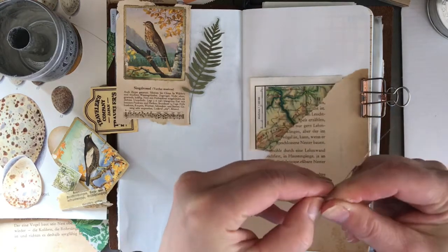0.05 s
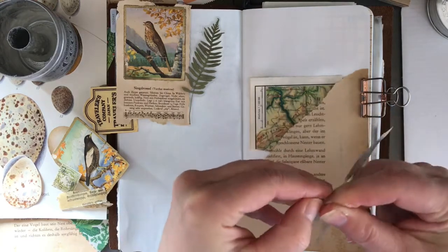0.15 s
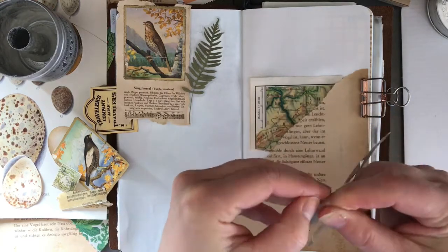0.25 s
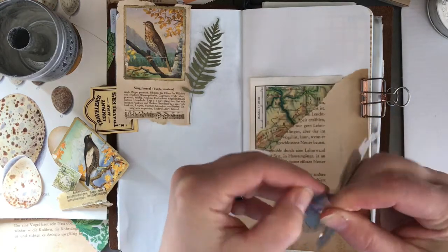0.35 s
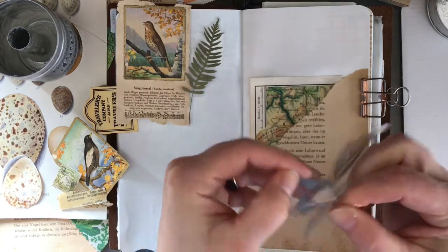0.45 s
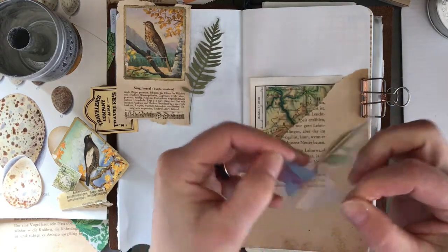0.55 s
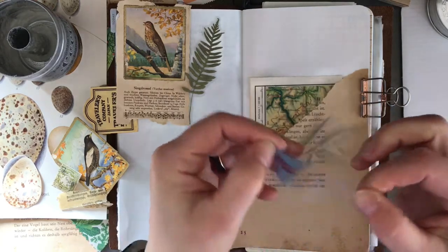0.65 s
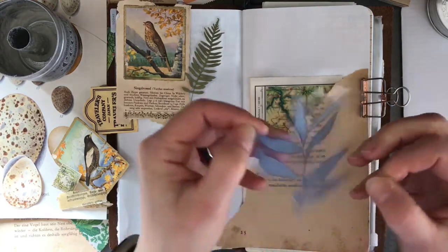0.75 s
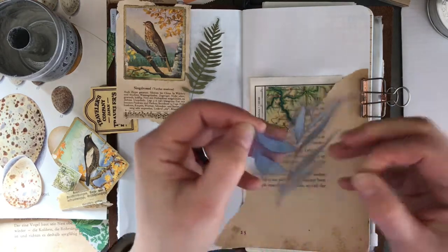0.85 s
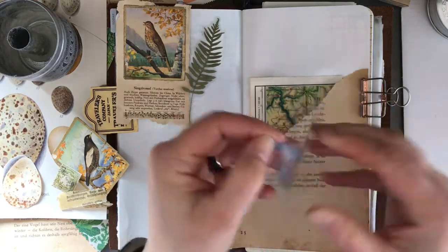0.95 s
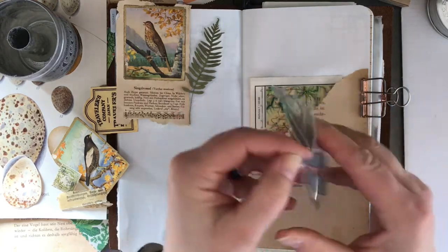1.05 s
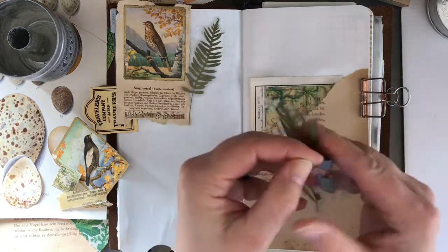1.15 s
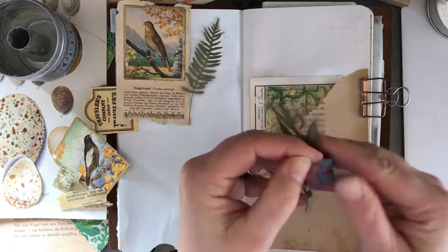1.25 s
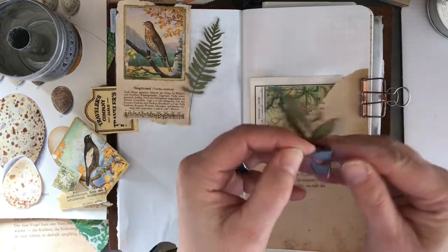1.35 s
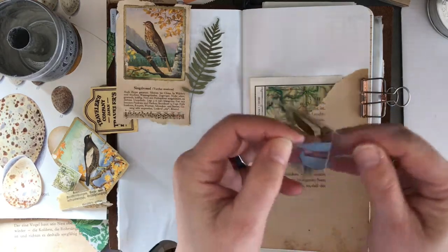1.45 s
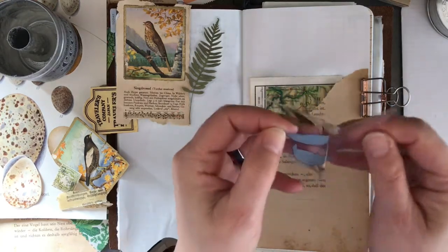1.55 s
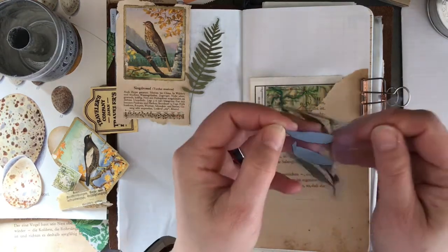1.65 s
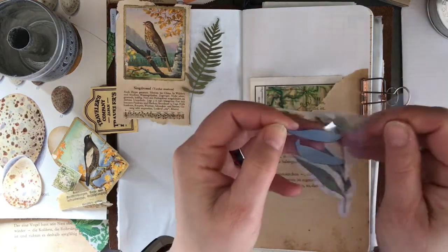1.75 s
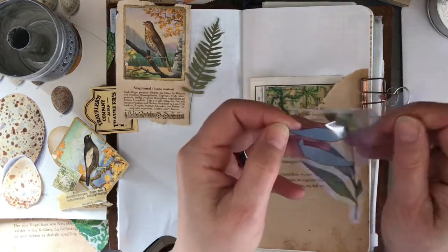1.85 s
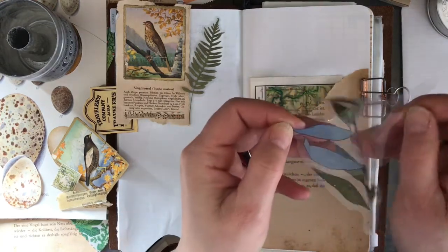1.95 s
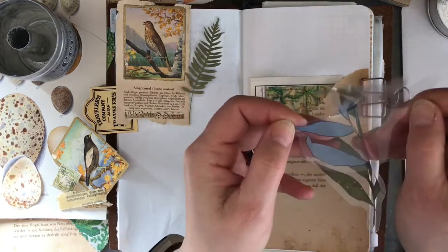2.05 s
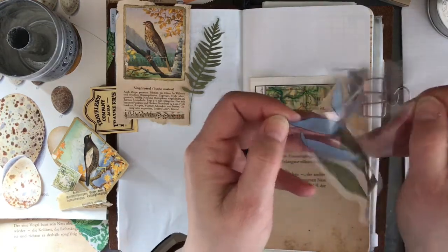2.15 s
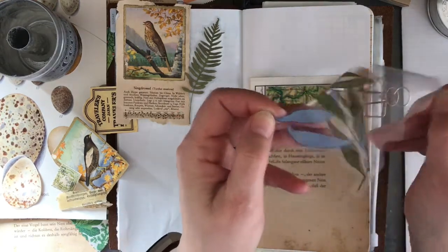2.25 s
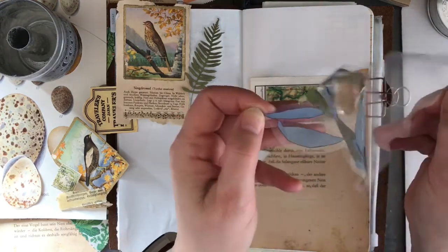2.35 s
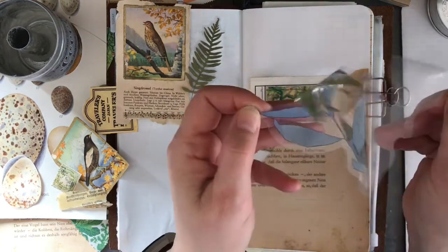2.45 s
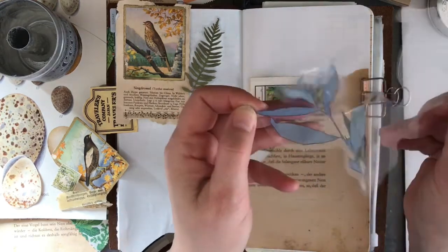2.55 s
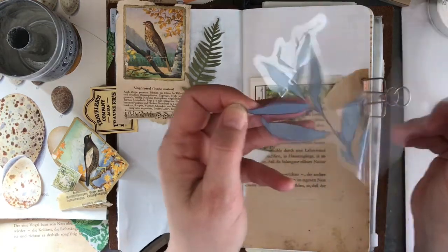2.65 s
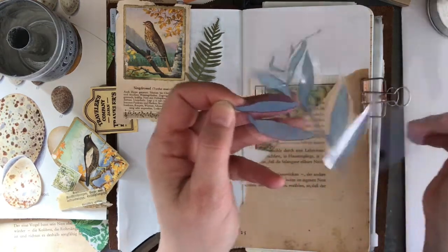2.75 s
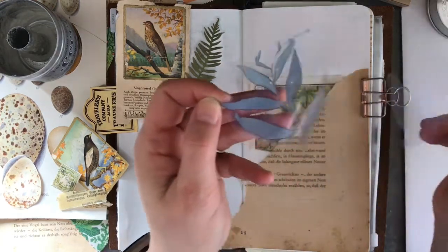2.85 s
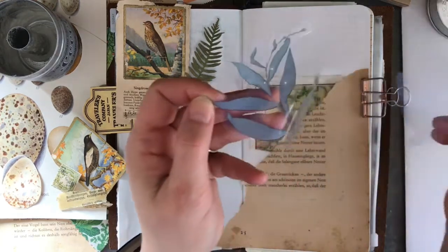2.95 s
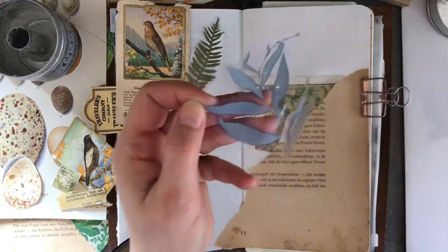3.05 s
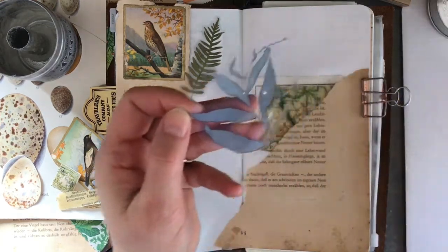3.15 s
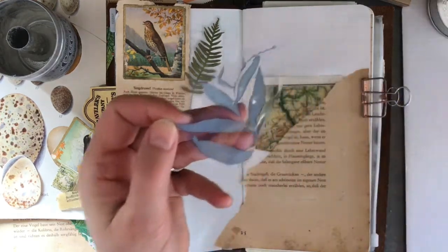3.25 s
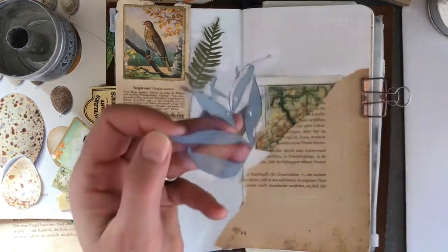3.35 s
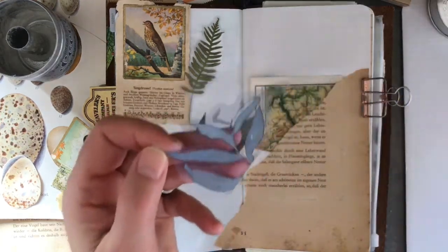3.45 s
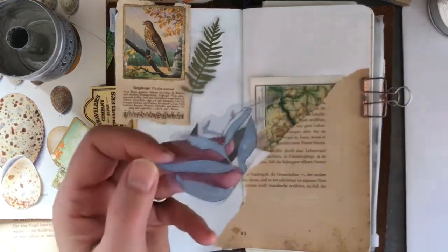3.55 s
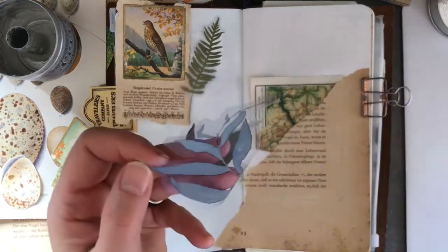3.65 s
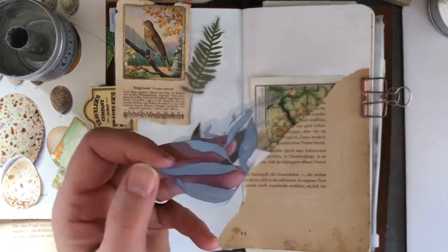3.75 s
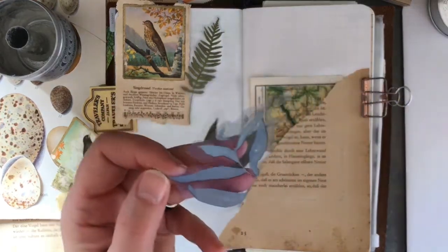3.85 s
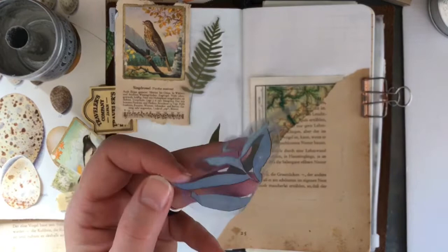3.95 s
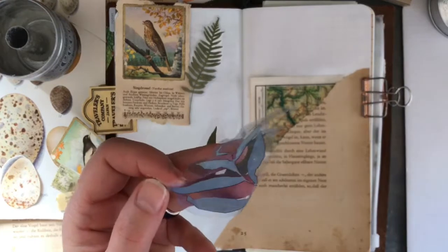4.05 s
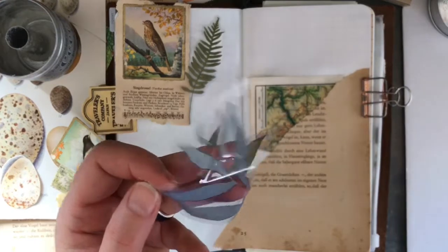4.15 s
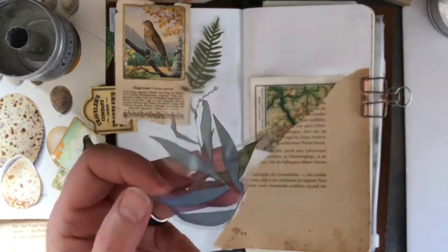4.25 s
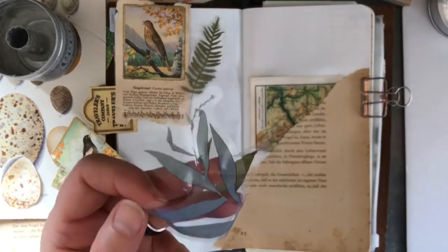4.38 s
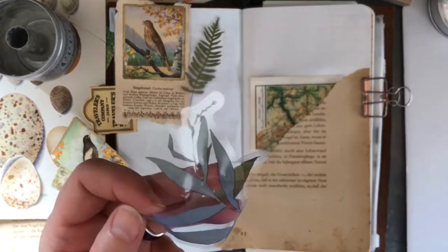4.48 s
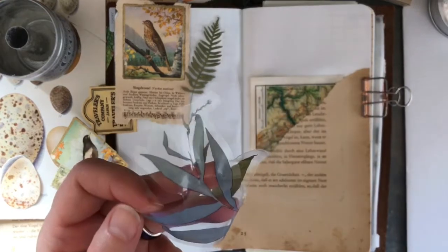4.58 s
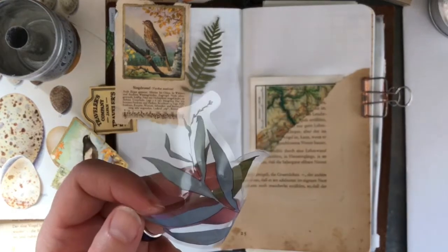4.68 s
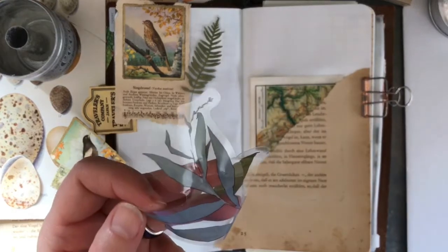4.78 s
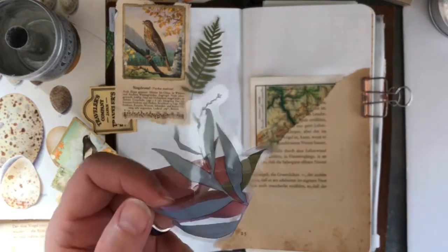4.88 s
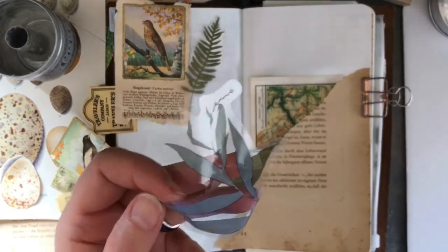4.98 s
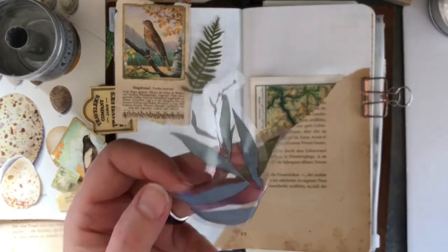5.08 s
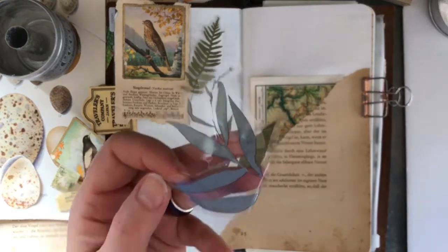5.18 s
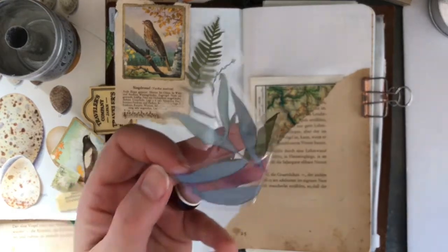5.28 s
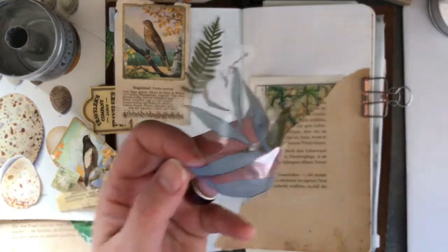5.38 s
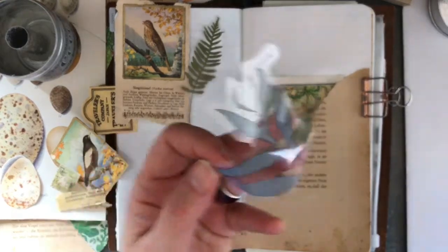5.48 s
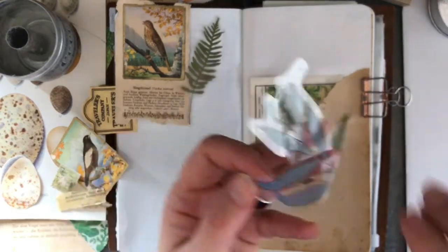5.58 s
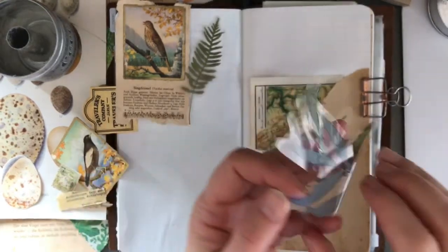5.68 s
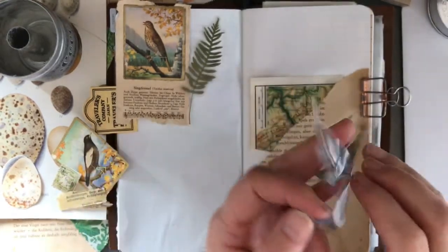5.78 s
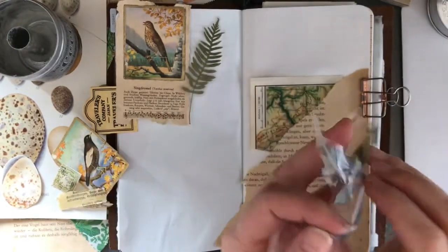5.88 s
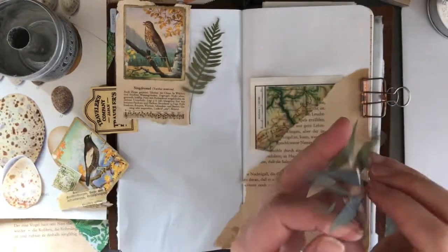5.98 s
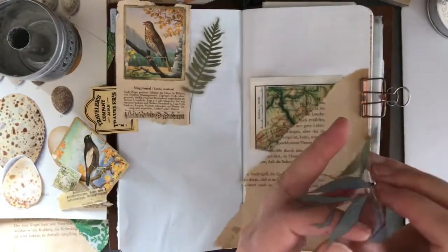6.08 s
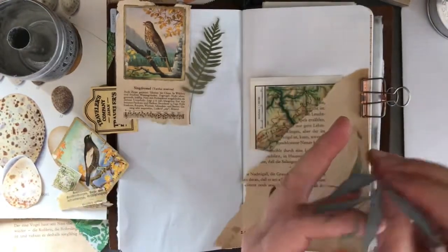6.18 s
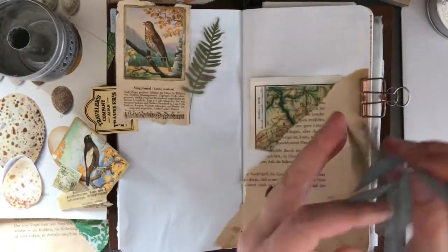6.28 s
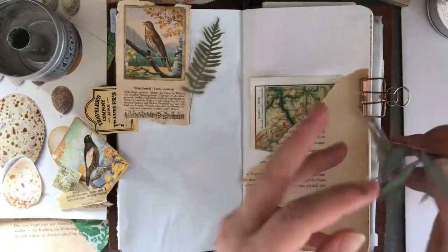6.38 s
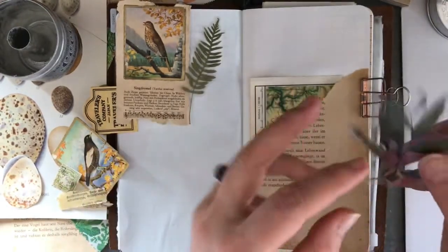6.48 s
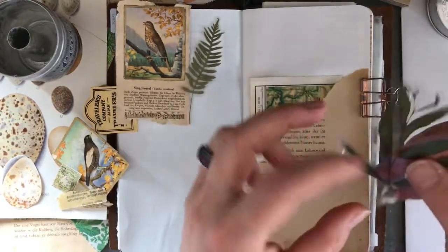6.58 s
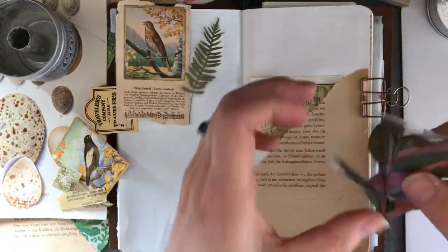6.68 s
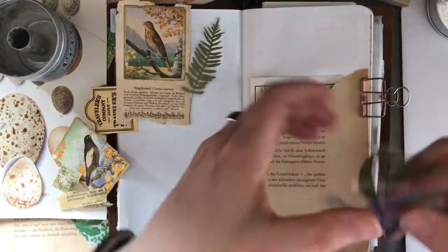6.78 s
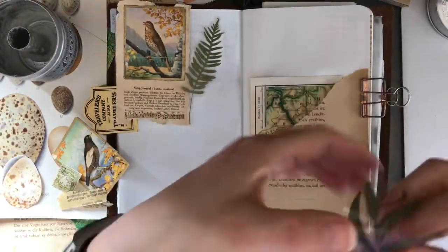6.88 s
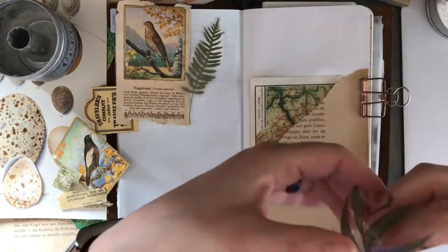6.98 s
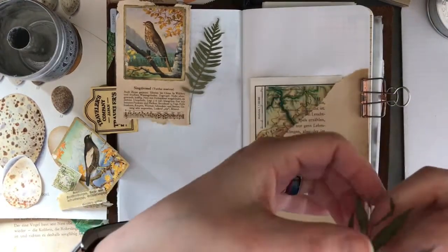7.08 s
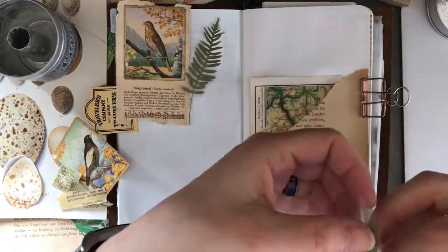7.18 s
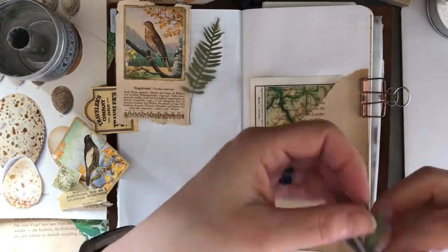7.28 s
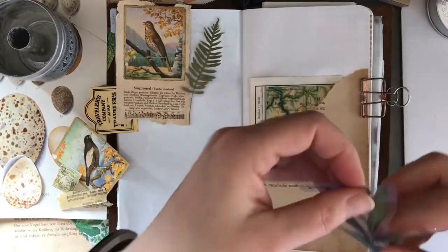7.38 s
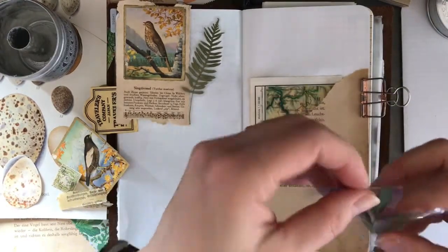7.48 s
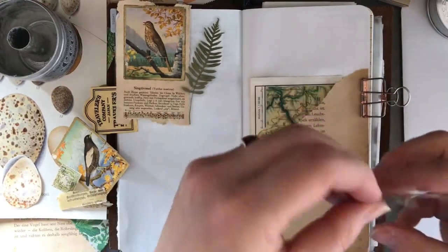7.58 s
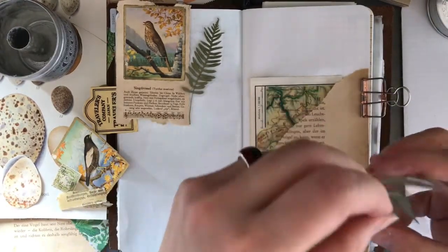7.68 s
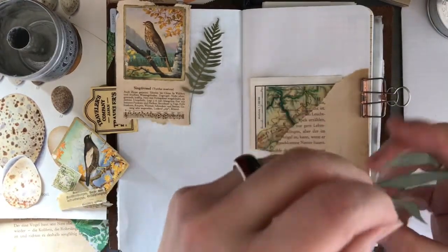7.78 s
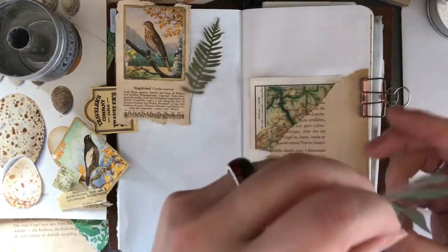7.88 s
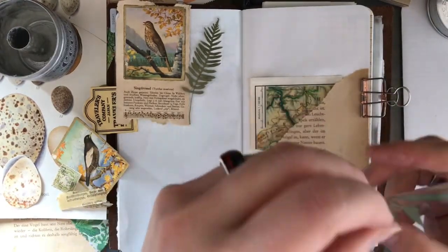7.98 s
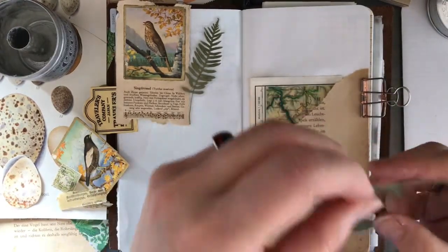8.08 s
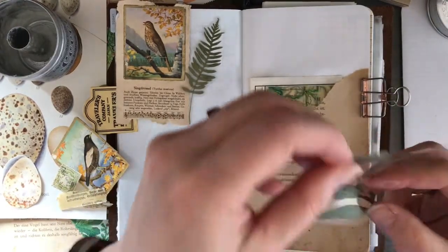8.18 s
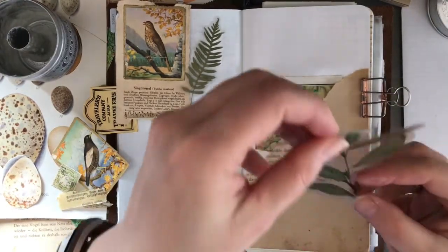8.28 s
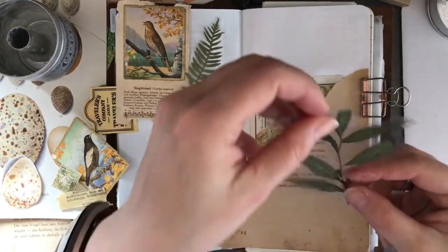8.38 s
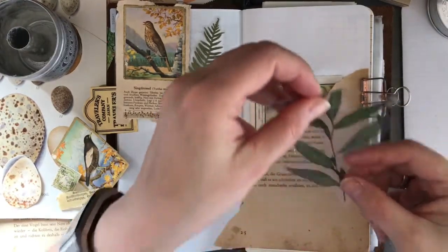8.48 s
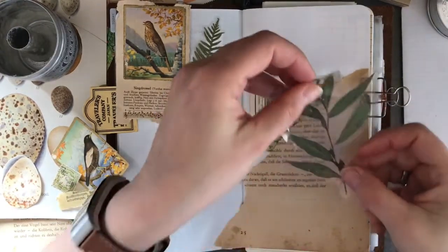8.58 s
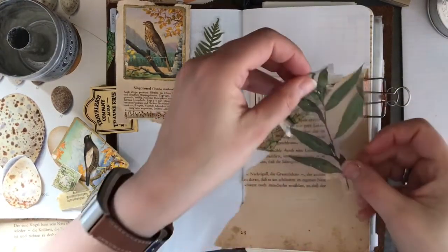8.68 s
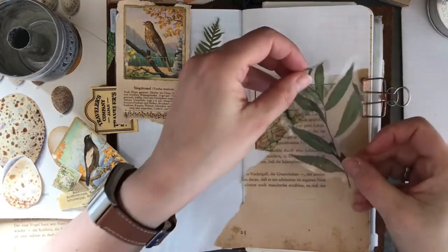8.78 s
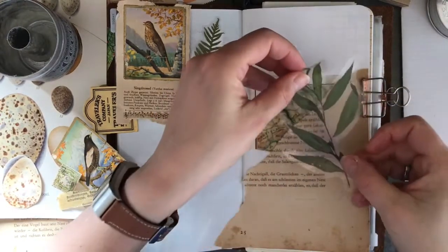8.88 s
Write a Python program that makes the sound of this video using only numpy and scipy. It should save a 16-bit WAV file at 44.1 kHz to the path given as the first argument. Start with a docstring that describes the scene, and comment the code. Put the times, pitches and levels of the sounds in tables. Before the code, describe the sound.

A close, dry indoor sound of stiff clear plastic film handled by fingers, over steady low rumble and faint hiss. Small ticks at 0.1 and 0.3 s lead to a bright double snap at 0.6 s with a short rustle. Faint sliding and fingertip squeaks follow. From about 1.8 to 2.75 s the sticker peels away in a dense run of sharp snaps and crackles, strongest near 1.9 and 2.15 s, with fuzzy rustling between. It then falls nearly quiet, with soft rubs and dull taps around 3.1-3.5 s and a small crinkle at 4.6 s. A crisp snap at 5.95 s starts a lighter crackle until 6.25 s. Sparse ticks continue, gathering at 7.3-7.5 s, with a clear snap at 7.67 s, soft rustling near 8 s, and a last click at 8.65 s. Low hand bumps are faint; the small room answers briefly.

```python
"""Peeling a clear plastic sticker

Fingers pick at a clear plastic sticker and peel it from its backing film, close to the microphone in a quiet room.
The stiff film buckles in sharp snaps, each an avalanche of tiny slips ringing the patch around the crease.
Sliding film and parting glue crackle finely as drifting, coloured friction; fingertips sing in narrow bands.
Hands bump the desk as damped low tones. Desk and small room answer the film, over steady rumble and hiss."""
import sys
import numpy as np
from scipy import signal
from scipy.fft import rfft, irfft
from scipy.io import wavfile
from scipy.ndimage import uniform_filter1d

SR = 44100
rng = np.random.default_rng(int(sys.argv[2]) if len(sys.argv) > 2 else 0)


def dump(signal):
    """Clip the signal to [-1, 1] and save it as 16-bit WAV at the path in sys.argv[1]."""
    limited = np.clip(np.atleast_2d(signal).T, -1, 1)
    pcm = np.round(limited * 32767).astype(np.int16)
    wavfile.write(sys.argv[1], SR, pcm)


N = 393813  # length of the scene in samples


def amp(db):
    """Decibels to gain."""
    return 10 ** (np.asarray(db) / 20)


def evened(x):
    """Scales to rms 1."""
    return x / np.sqrt(np.mean(x ** 2) + 1e-20)


def read(points, hz):
    """Reads a table on a log-frequency axis."""
    f, value = np.transpose(points)
    return np.interp(np.log(hz + 1), np.log(f + 1), value)


def add(mix, s, sound):
    """Adds a sound into the mix at time s."""
    part = mix[max(0, round(s * SR)):][:len(sound)]
    part += sound[:len(part)]


def humps(rows, hz):
    """Gain in dB of a few resonances or hollows."""
    return sum(db / (1 + (2 * (hz - centre) / width) ** 2) for centre, width, db in rows)


def causal(db):
    """Minimum-phase impulse response with this gain: a sharp start, then the ring."""
    cepstrum = irfft(np.log(amp(np.maximum(db, -100))))
    half = len(cepstrum) // 2
    # fold the time before zero onto the time after it
    cepstrum[1:half] *= 2
    cepstrum[half + 1:] = 0
    return irfft(np.exp(rfft(cepstrum)))


def shelves(hz, body_db, edge_db, body_hz=2700, edge_hz=9500):
    """A wide flexing area adds body below body_hz; a tight crease adds edge above edge_hz."""
    body = body_db / (1 + (hz / body_hz) ** 4)
    edge = edge_db * (1 - 1 / (1 + (hz / edge_hz) ** 8))
    return body + edge


def slips(count, per_s, spread_db, smooth):
    """Tiny stick-slip clicks of uneven size, mixed with a share of smooth friction noise."""
    size = amp(spread_db * np.minimum(rng.exponential(1, count), 4)) * rng.choice([-1, 1], count)
    clicks = size * (rng.random(count) < per_s / SR)
    smooth = np.clip(smooth, 0, 1)
    return np.sqrt(1 - smooth) * evened(clicks) + np.sqrt(smooth) * rng.standard_normal(count)


# Still air of the room and microphone hiss. Each row: frequency in Hz, relative density in dB per Hz.
AIR_SPECTRUM = [(12, -36), (22, -5), (47, -1), (80, -8.5), (240, -17), (620, -24.5), (1100, -25.5),
                (2300, -29), (4000, -31), (6500, -34.5), (9500, -37), (11500, -37), (14500, -37.5),
                (16000, -41)]
AIR_DB = -63.5  # rms level


def air():
    """Steady noise coloured into the rumble of the room and the hiss of the microphone."""
    hz = np.fft.rfftfreq(N, 1 / SR)
    spectrum = rfft(rng.standard_normal(N)) * amp(read(AIR_SPECTRUM, hz))
    return amp(AIR_DB) * evened(irfft(spectrum, N))


# Dull bumps of the hands on the desk and of fingers on the sheet, close to the microphone.
# Each row: start in seconds, peak of the swell in dB, pitch in Hz, time to that peak in seconds.
HAND_BUMPS = [(1.613, -49.5, 31, 0.025), (2.19, -56, 35.4, 0.032), (3.473, -53.5, 850, 0.0026),
              (3.507, -62, 854, 0.0097), (3.813, -55, 65, 0.035), (5.714, -46.5, 46, 0.013),
              (6.684, -61, 38, .04), (7.47, -56, 45.6, 0.019)]


def bumps():
    """Soft pushes: each is one tone that swells and dies away."""
    out = np.zeros(N)
    t = np.arange(SR // 2) / SR
    for s, level_db, hz, length in HAND_BUMPS:
        swell = t / length * np.exp(1 - t / length)
        add(out, s, amp(level_db) * swell * np.sin(2 * np.pi * hz * t))
    return out


# Fingertips dragging on taut film, which sings in a narrow band.
# Each row: start in seconds, length in seconds, level in dB, pitch in Hz, width of the band in Hz.
FINGER_DRAGS = [(1.103, 0.036, -62, 5160, 500), (1.369, 0.12, -69, 2150, 300),
                (1.368, 0.098, -61.5, 5640, 1100), (1.38, 0.11, -73.5, 1200, 250),
                (3.092, 0.14, -70, 8200, 450), (3.098, .18, -70.5, 5700, 600),
                (4.597, 0.096, -68, 5600, 350), (4.6, 0.087, -63.5, 3900, 900),
                (7.815, 0.1, -66, 7800, 910)]


def drags():
    """Skin sticks and slips on the stretched film and excites one resonance."""
    out = np.zeros(N)
    for s, length, level_db, hz, width in FINGER_DRAGS:
        friction = slips(SR // 2, per_s=740, spread_db=-1.0, smooth=0.93)[:round(length * SR)]
        sing = signal.lfilter(*signal.iirpeak(hz, hz / width, fs=SR), friction)
        add(out, s, amp(level_db) * evened(sing) * signal.windows.tukey(len(sing), .35))
    return out


# Strokes of film sliding or unsticking in the hands.
# Each row: time of the peak in seconds, level in dB, swell in seconds, fade in seconds, body in dB, edge in dB.
FILM_STROKES = [(0.5, -65.5, .17, 0.15, -17, 12.5), (0.6, -50.5, 0.024, 0.052, -4, -7),
                (0.96, -69.5, 0.073, 0.068, 1, -2), (1.12, -60, 0.029, 0.024, -6, -4),
                (1.24, -64, 0.072, 0.055, 4, 0), (1.425, -55.5, 0.062, 0.075, -10, 4),
                (1.6, -69.5, 0.27, 0.47, 4, 9.5), (2.08, -61.5, 0.035, 0.054, 20.5, 12),
                (2.2, -52, 0.11, 0.096, -4, 2), (2.28, -64.5, 0.044, 0.062, 19.5, 1),
                (2.445, -54, 0.034, 0.053, 14, -30), (2.64, -60, 0.14, 0.092, 14, 2),
                (3.13, -65.5, .04, .08, -4, -10), (3.25, -64, .05, 0.064, 4.5, -6),
                (3.39, -69, 0.043, 0.058, 1, 0), (4.14, -75.5, .17, 0.092, 14, 4),
                (4.63, -64, 0.034, .06, 7.5, -19), (4.74, -64, .03, 0.027, 9, -2),
                (5.67, -70.5, 0.13, 0.25, -4, 6), (6.08, -58, 0.043, 0.11, 7.5, 2),
                (6.2, -67, 0.03, 0.022, 3, 12), (6.27, -69, 0.045, .08, 11, -3),
                (6.46, -67.5, 0.023, 0.026, 13, -20), (6.95, -60, 0.016, .022, -3, 2),
                (7.02, -70, .05, .07, -1, 0), (7.25, -75, 0.36, 0.22, 6, 7),
                (7.48, -69, 0.16, 0.17, 12, -6), (7.66, -60.5, 0.071, 0.082, 2, 1),
                (8.0, -60.5, 0.091, 0.11, 3, -9), (8.1, -61, 0.052, 0.061, 1, -6),
                (8.44, -70, 0.034, 0.034, 19.5, -15.5), (8.68, -73, 0.08, 0.078, 18.5, -6)]
STROKE_CURVE = 1.3  # flanks of a stroke: 1 is exponential, 2 a bell
GRIP_DB, GRIP_BODY_DB = -82.5, 10.5  # the fingers never hold the sheet quite still


def strokes(hz, t):
    """Strength of the friction: each stroke swells and fades with its own colour, over the faint grip."""
    power = amp(GRIP_DB + shelves(hz, GRIP_BODY_DB, 0))[:, None] ** 2
    for s, level_db, swell, fade, body_db, edge_db in FILM_STROKES:
        flank = np.where(t < s, swell, fade)
        speed = np.exp(-abs((t - s) / flank) ** STROKE_CURVE)
        colour = amp(level_db + shelves(hz, body_db, edge_db))
        power = power + np.outer(colour ** 2, speed ** 2)
    return np.sqrt(power)


# What the sliding film radiates. Each row: frequency in Hz, relative density in dB per Hz.
SLIDE_SPECTRUM = [(100, -27), (400, -6), (1200, -12.5), (2200, -10), (2900, -6), (4500, -2.5), (6300, -1),
                  (8500, -1.5), (10500, -3.5), (13500, -9.5), (16000, -12.5)]
# Standing resonances of the held sheet, heard in every snap and stroke.
# Each row: frequency in Hz, width in Hz, height in dB.
SHEET_MODES = [(1175, 150, 5.5), (2119, 170, 5.5), (2470, 100, 5), (3870, 300, 0), (4800, 160, 1),
               (5700, 350, 1), (7000, 270, 0.5), (8290, 540, 3), (10900, 500, -0.5)]


def rub(gain_db=0.02, patchy_db=1.93, tick_db=-8, flutter_db=1.7):
    """Fine friction grains and scattered glue ticks, coloured by resonances that drift as the sheet bends."""
    grains = slips(N, per_s=1800, spread_db=5.5, smooth=0.87)
    # each thread of glue that parts gives a tick about a millisecond long
    partings = abs(slips(N, per_s=60, spread_db=3.5, smooth=0))
    tick_swell = signal.lfilter([1], [1, -np.exp(-1 / (0.0017 * SR))], partings)
    ticks = evened(tick_swell * rng.standard_normal(N))
    hz, t, z = signal.stft(grains + amp(tick_db) * ticks, SR, nperseg=512)
    # the colour drifts, smoothed first across frequency and then along time
    drift = uniform_filter1d(rng.standard_normal(z.shape), size=5, axis=0)
    drift = evened(uniform_filter1d(drift, size=26, axis=1))
    sheet = evened(amp(read(SLIDE_SPECTRUM, hz) + humps(SHEET_MODES, hz)))[:, None]
    flutter = rng.standard_normal(len(t))  # the grip catches and lets go every few milliseconds
    z = z * sheet * strokes(hz, t) * amp(patchy_db * drift + flutter_db * flutter)
    return amp(gain_db) * signal.istft(z, SR, nperseg=512)[1][:N]


# What the snapping film radiates. Each row: frequency in Hz, relative density in dB per Hz.
FILM_SPECTRUM = [(60, -24), (160, -15), (400, -12.5), (700, -9.5), (1100, -10), (1650, -10), (2100, -7.5),
                 (2700, -6.5), (3900, 0), (7500, -0.5), (10000, -2.5), (14000, -10), (16500, -17)]
RISE_SHARE = 0.15  # build-up time constant, as a share of the buckle's length
RING_DB = 9  # height of the flexed patch's ring
SETTLE_DB, SETTLE_STRETCH = -27.5, 3.5  # the film then settles: this much weaker, this many times longer


def snap(level_db, length, body_db, edge_db, ring_hz, ring_width=0.31, ripple_db=2, clump_db=2.0):
    """A crease runs through the film as a short avalanche of slips and rings the patch around it."""
    t, hz = np.arange(4096) / SR, np.fft.rfftfreq(4096, 1 / SR)
    age = t / max(length, 1e-4)
    fall = np.exp(-age ** 1.41) + amp(SETTLE_DB) * np.exp(-age / SETTLE_STRETCH)
    swell = (1 - np.exp(-age / RISE_SHARE)) * fall
    # the crease catches and jumps, so its slips come in clumps of about a millisecond
    clumps = evened(uniform_filter1d(rng.standard_normal(len(t)), size=50))
    crackle = slips(len(t), per_s=5700, spread_db=2.0, smooth=0.33)
    drive = swell * amp(clump_db * clumps) * crackle
    # every bend has its own crowd of damped modes, with one standing out
    modes = evened(signal.oaconvolve(rng.standard_normal(len(hz)), np.hanning(40), "same"))
    patch_db = humps([(ring_hz, ring_width * ring_hz, RING_DB)], hz)
    rings_db = humps(SHEET_MODES, hz) + patch_db + ripple_db * modes
    colour = causal(read(FILM_SPECTRUM, hz) + shelves(hz, body_db, edge_db) + rings_db)
    sound = signal.fftconvolve(drive, colour)[:len(t)]
    # longer buckles carry more energy at the same level
    return amp(level_db) * evened(sound) * np.sqrt(np.mean(swell ** 2))


# Buckles of the film in the hands, close to the microphone. Each row: start in seconds, strength in dB,
# length in seconds, body in dB, edge in dB, ring of the flexed patch in Hz.
FILM_SNAPS = [(0.084, -51, .0015, 0, 4, 9000), (0.338, -37.5, 0.0017, -2.5, 14.5, 2730),
              (0.457, -41, .001, 0, 15, 7650), (0.559, -46.5, 0.0046, -6, 12, 9010),
              (0.599, -32, .005, -1, 7, 2650), (0.6056, -22.5, 0.0083, 4, 9.5, 7000),
              (0.862, -49.5, 0.0042, 18, 6, 6600), (1.138, -50.5, 0.0056, -1, 6, 5270),
              (1.538, -51, .004, -1, -8, 3280), (1.693, -51, 0.0051, 25, 5, 6330),
              (1.7845, -34.5, 0.003, 2, 6, 2220), (1.7964, -47, .0024, 6, 2, 6990),
              (1.828, -33, 0.0058, 9.5, 1, 7300), (1.856, -27.5, 0.002, -4, 8, 6450),
              (1.88, -39, 0.0054, 25, -8, 606), (1.891, -18, 0.0033, 7, -2, 3700),
              (2.012, -30.5, 0.0035, 7.5, 5.5, 3930), (2.044, -37.5, 0.0059, 11.5, -11, 4090),
              (2.0698, -31.5, 0.0037, 4, 8, 10080), (2.1003, -32, 0.002, -9, 6, 6500),
              (2.123, -27.5, 0.0039, 0.5, 6, 6240), (2.141, -33, 0.0021, -4, 18, 5270),
              (2.153, -14.5, 0.0052, 0.5, 5, 2060), (2.238, -43, .014, 4, 11, 6600),
              (2.2542, -26.5, 0.0041, 2.5, 0, 9600), (2.29, -30, 0.0099, 6, -1, 9500),
              (2.3927, -38.5, 0.0017, 6, 16, 9270), (2.411, -28.5, 0.0093, 3.5, 0, 4300),
              (2.427, -38, 0.0093, 7, -25, 3950), (2.4346, -27.5, 0.0078, 6, -21, 9600),
              (2.4827, -22.5, 0.002, -9.5, -11, 1570), (2.5368, -32.5, 0.0025, 16, -3, 11610),
              (2.5405, -24, 0.0039, 8, 5, 5270), (2.597, -24, .0035, 1, 7, 7650),
              (2.601, -24.5, 0.01, 5.5, 5, 4050), (2.619, -36.5, .0134, 9, -10, 5420),
              (2.652, -33.5, 0.0014, 1, -4, 9800), (2.677, -29.5, 0.0011, -7, -3, 9270),
              (2.7013, -27.5, 0.0006, 4, 25, 7820), (2.7058, -31.5, .0055, 0, 3, 4740),
              (2.716, -44.5, 0.017, 14.5, -25, 3120), (2.7677, -45, .0021, -9, 7, 8900),
              (2.868, -56.5, .007, 18, 7, 680), (4.031, -56.5, .0038, 16, -3, 2530),
              (3.2617, -47.5, 0.01, -6, -9.5, 12000), (3.4705, -48.5, 0.011, 18.5, -15, 3400),
              (3.504, -52, .013, 25, -17, 3170), (4.125, -51, .0019, 3, -5, 2530),
              (4.593, -40, .015, 11.5, -14, 4050), (5.7103, -44, 0.0048, -4, -6, 8880),
              (5.888, -56, 0.014, 9, -9, 2600), (5.9263, -44, 0.0032, 1, 0, 5580),
              (5.937, -49, .004, -4, -5, 9000), (5.955, -25.5, 0.0023, -12, 0, 5900),
              (5.96, -35.5, .0098, 7.5, 3, 7000), (6.02, -31, 0.00093, -4, 2, 2500),
              (6.0877, -32, .0038, -6.5, 3, 2600), (6.094, -34, 0.013, -1.5, -5, 2700),
              (6.109, -36.5, 0.0088, -10, -9, 2800), (6.2502, -42, 0.0063, 3, 7, 4300),
              (6.441, -43.5, 0.0029, -1, -15, 1980), (6.451, -52.5, 0.016, 8, -22, 3050),
              (6.559, -54.5, .0068, 9, 3, 4500), (6.703, -50.5, 0.0034, 45, -4, 674),
              (6.907, -48.5, 0.0085, -17, 2.5, 9150), (7.049, -54, .003, 8, 9, 6790),
              (7.132, -45.5, 0.0062, 2.5, -13, 9010), (7.293, -36, 0.0016, -5, -5, 3000),
              (7.352, -47, 0.0032, 15, 3, 5120), (7.388, -52, 0.013, 13, -6, 5740),
              (7.4325, -42, .0041, 7, 0, 12000), (7.443, -38, 0.0074, -2, -2, 12500),
              (7.46, -37.5, 0.0086, -2.5, -7, 2900), (7.503, -45, 0.0033, 1, -14, 2300),
              (7.5333, -48, .014, 6.5, -2, 9530), (7.646, -41, 0.01, 2, -13, 9010),
              (7.661, -42.5, 0.026, 3, -4, 2180), (7.6718, -25.5, 0.006, 1, 1.5, 8000),
              (8.11, -41.5, 0.0027, 9, 4, 8760), (8.392, -44, 0.0032, -2, 0, 6800),
              (8.4585, -42, 0.0032, 7.5, -3, 3170), (8.6427, -38, .0023, 7, 7, 1710),
              (8.65, -31.5, 0.0016, 2, 5, 3270)]


def snaps():
    """All the buckles of the stiff film, each springing over at its own time."""
    out = np.zeros(N)
    for s, *shape in FILM_SNAPS:
        add(out, s, snap(*shape))
    return out


# Colour of the answer from desk and room. Each row: frequency in Hz, gain in dB.
WALL_COLOUR = [(200, 4.5), (1000, 1.5), (4000, -3.5), (8000, -7.5), (15000, -7.5)]


def desk(x, level_db=-14, decay=0.018):
    """Quick scatter from the desk and hands: sparse random echoes, dying over decay seconds."""
    t = np.arange(SR // 16) / SR
    echoes = rng.choice([-1., 1.], len(t)) * (rng.random(len(t)) < 4000 / SR)
    taps = echoes * (t > .002) * np.exp(-t / decay)
    colour = causal(read(WALL_COLOUR, np.fft.rfftfreq(256, 1 / SR)))
    answer = signal.fftconvolve(taps / np.linalg.norm(taps), colour)
    return amp(level_db) * signal.oaconvolve(x, answer)[:N]


# Ring of the small room. Each row: frequency in Hz, time to die by 60 dB in seconds.
ROOM_RING = [(200, 0.27), (1000, .32), (4000, 0.35), (8000, 0.38), (15000, 0.25)]


def room(x, level_db=-17.0):
    """The walls store the sound's energy band by band and give it back as a diffuse, dying wash."""
    hz, t, z = signal.stft(x, SR, nperseg=256)
    power = uniform_filter1d(abs(z) ** 2, size=11, axis=0)
    # share of the energy kept from one frame to the next; the answer starts three frames late
    kept = np.exp(-2 * np.log(1000) * t[1] / read(ROOM_RING, hz))
    stored = np.array([signal.lfilter([0, 0, 0, 1 - k], [1, -k], band) for k, band in zip(kept, power)])
    diffuse = signal.stft(rng.standard_normal(N), SR, nperseg=256)[2]
    gain = amp(level_db + read(WALL_COLOUR, hz))[:, None]
    wash = diffuse / np.std(diffuse) * np.sqrt(abs(stored)) * gain
    return signal.istft(wash, SR, nperseg=256)[1][:N]


def scene():
    """The film in the room, over the desk and the still air."""
    film = snaps() + rub() + drags()
    return (film + desk(film) + room(film) + bumps() + air())[None]


# Hollows in the response of the microphone port. Each row: frequency in Hz, width in Hz, gain in dB.
PORT_HOLLOWS = [(4820, 380, -3), (7800, 500, -1.5), (10420, 710, -5)]
EDGE_HZ = 15950  # upper limit of the sound's band, in Hz


def record(dry):
    """The colour of the microphone port, then a steep cut of the highest treble."""
    port = causal(humps(PORT_HOLLOWS, np.fft.rfftfreq(1024, 1 / SR)))
    heard = signal.oaconvolve(dry, port[None])[:, :N]
    treble_cut = signal.firwin(401, EDGE_HZ, window=("kaiser", 8), fs=SR)
    return signal.oaconvolve(heard, treble_cut[None], "same")


dry = scene()
out = record(dry)
dump(out)
```